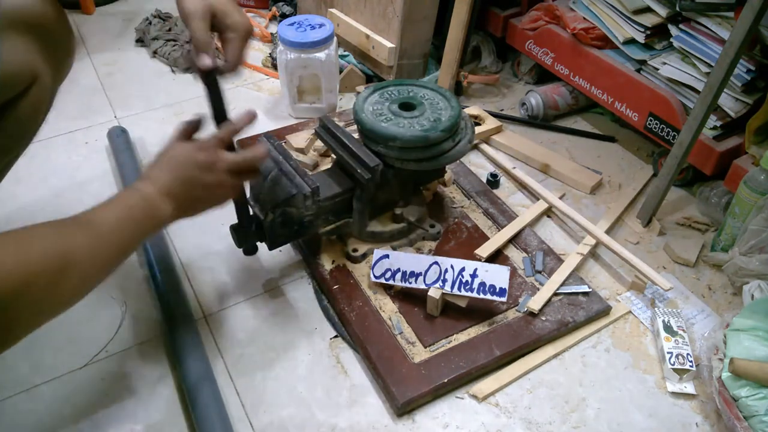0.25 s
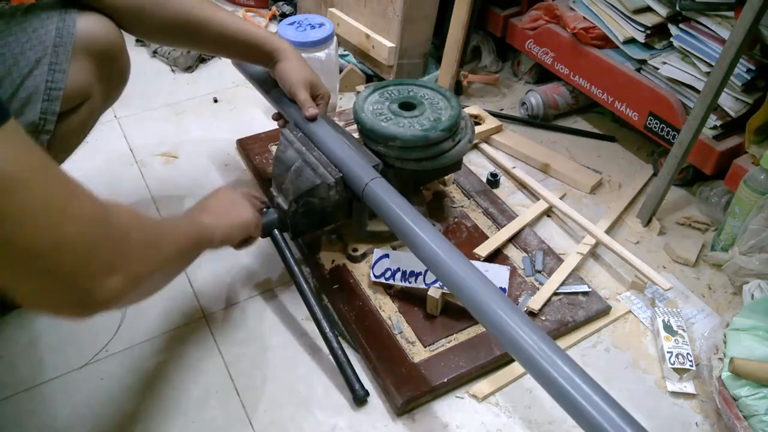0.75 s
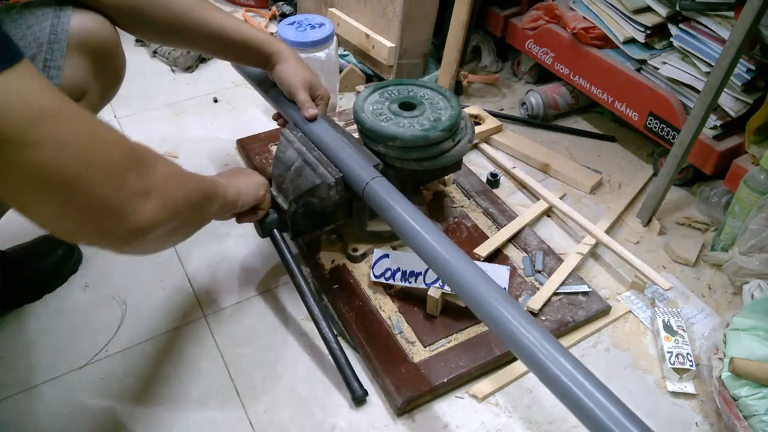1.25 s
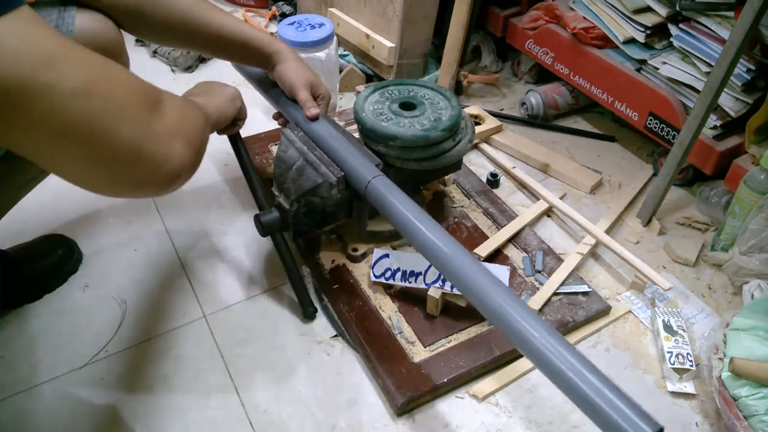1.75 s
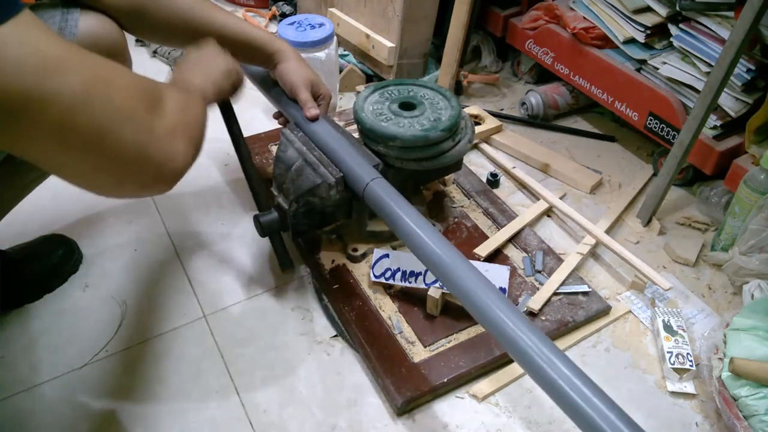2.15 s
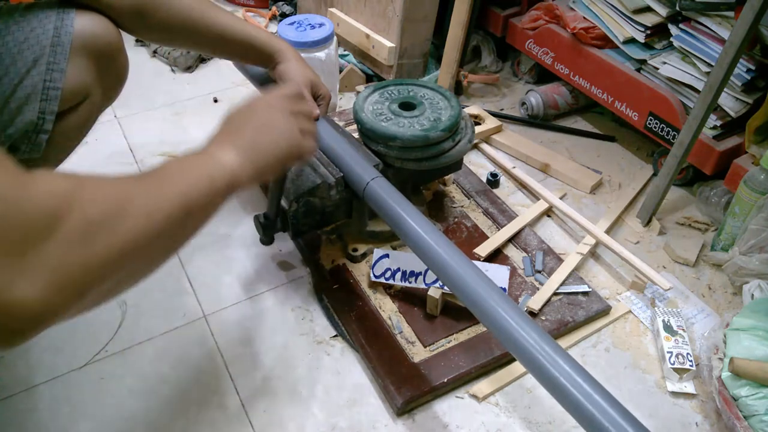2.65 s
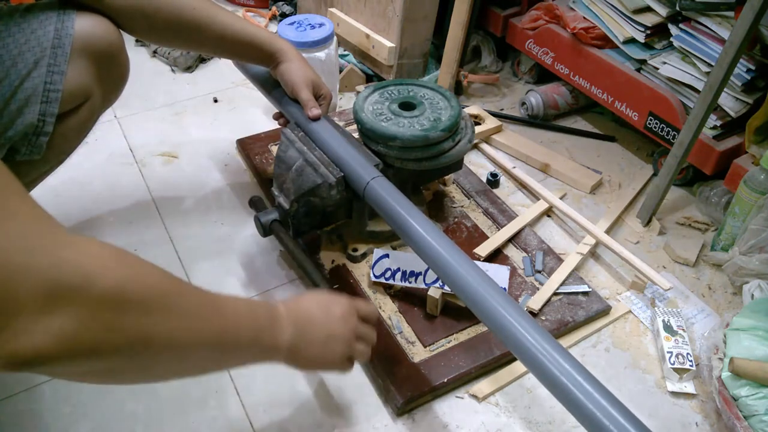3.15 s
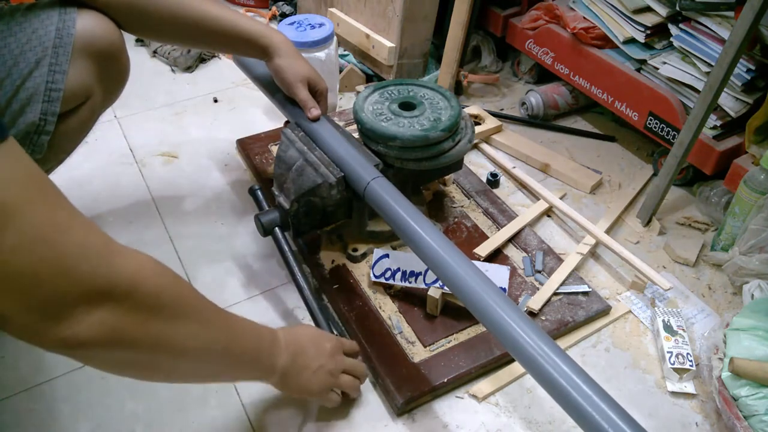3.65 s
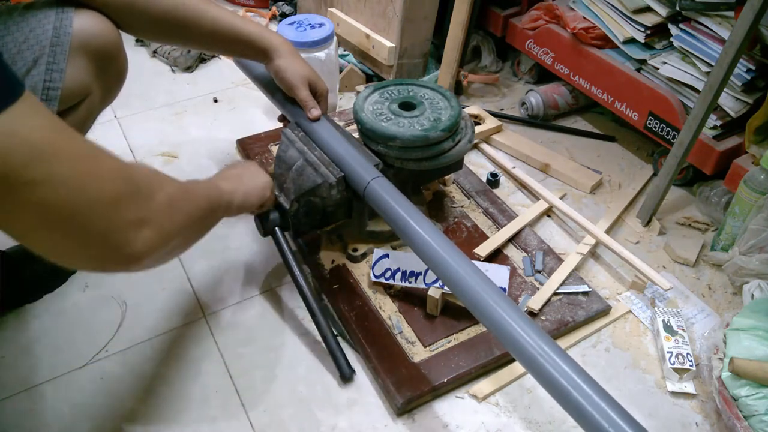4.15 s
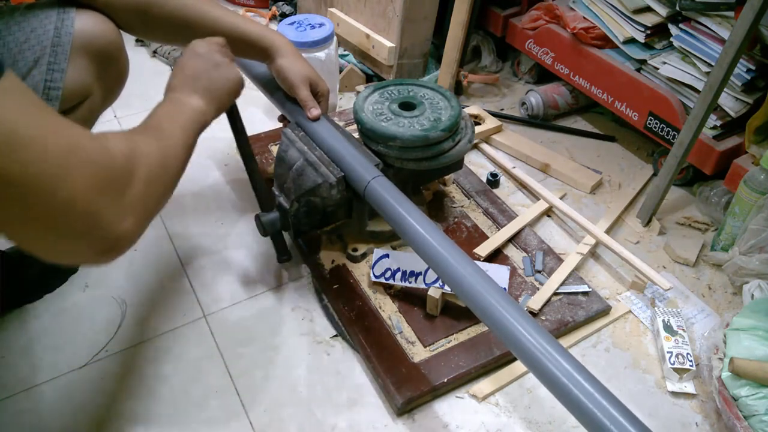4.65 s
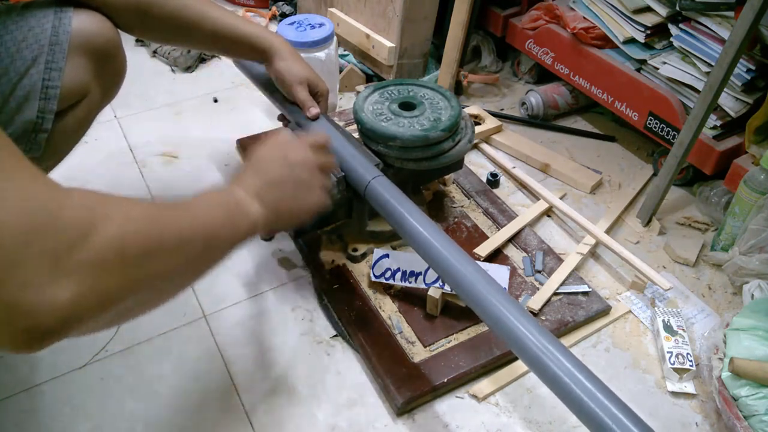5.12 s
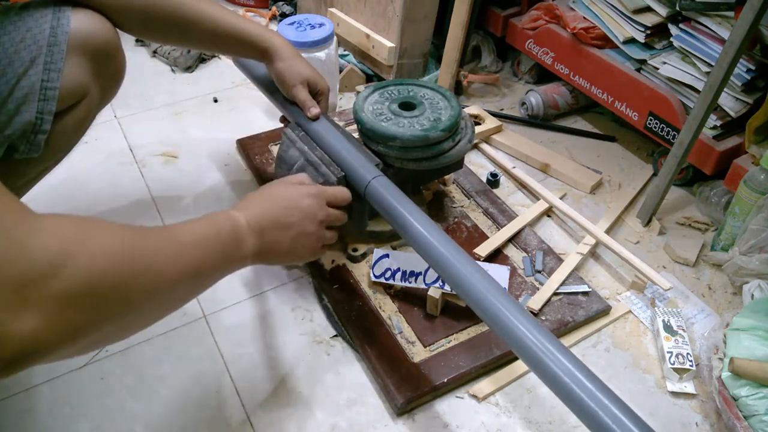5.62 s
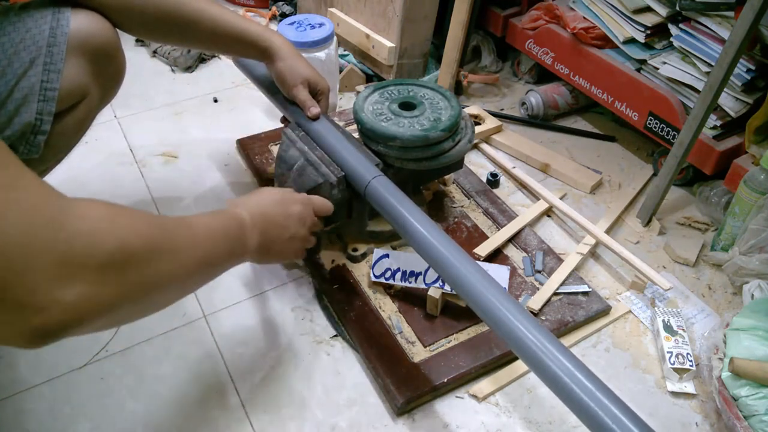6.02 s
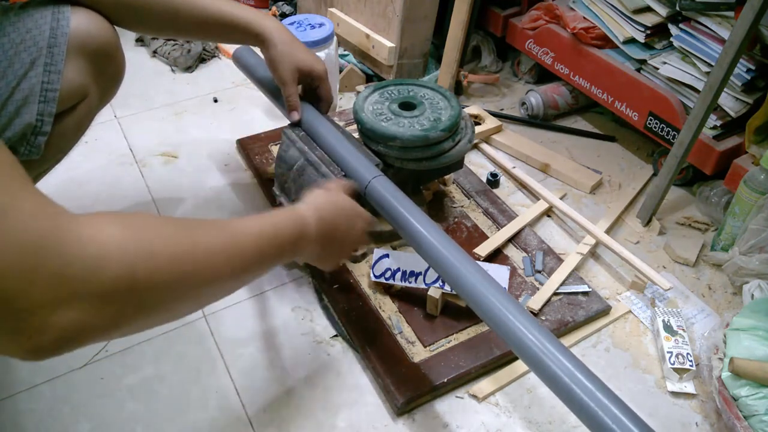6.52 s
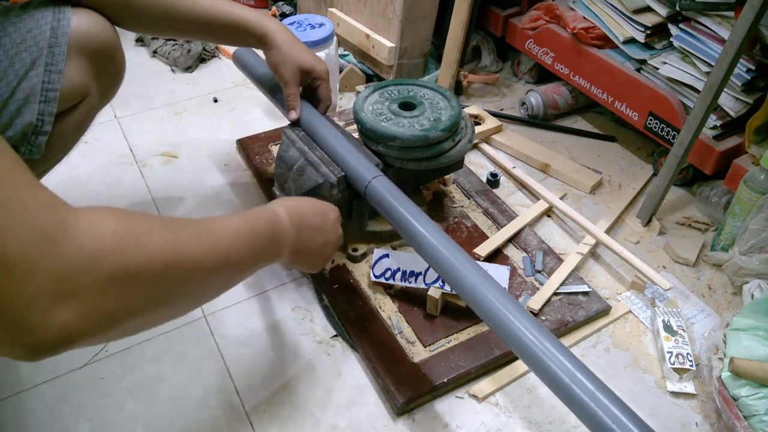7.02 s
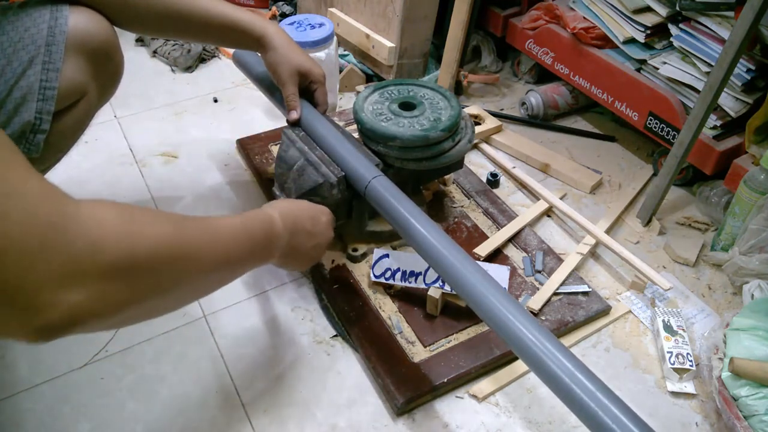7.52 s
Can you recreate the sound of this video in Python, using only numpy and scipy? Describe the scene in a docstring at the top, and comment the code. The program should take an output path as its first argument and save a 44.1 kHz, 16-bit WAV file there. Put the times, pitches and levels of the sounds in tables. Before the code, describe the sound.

Close, single-channel sound of a steel bar sliding and knocking through the screw head of an iron vise. Sparse soft rubs and thin gliding squeaks separate a few sharp clanks with quick bouncing rattles and dull board thumps. The strongest hits ring high and briefly, echoing off hard tiles. After a late clunk come faint squeaks, two light knocks and a last clack, over steady rumble, hiss and hum.

```python
"""A cast-iron bench vise on a wooden board is screwed shut in a small tiled workshop.
Its loose steel handle slides through the screw head (filtered friction noise and ringing modes)
and knocks and rattles (noisy contacts ringing handle, screw, casting and board).
The screw squeaks (narrow gliding noise) and clunks across its slack (dying sines); a palm brushes the bar.
Rumble, hiss and a wavering hum fill the room; all but these pass through a decaying noise tail."""
import sys
import numpy as np
from scipy import signal
from scipy.fft import rfft, irfft
from scipy.io import wavfile
from scipy.ndimage import uniform_filter1d

SR = 44100
rng = np.random.default_rng(int(sys.argv[2]) if len(sys.argv) > 2 else 0)


def wav_out(sig):
    """Save sig, one row per channel (or a flat mono array), as 16-bit PCM at SR to the path in sys.argv[1]."""
    wavfile.write(sys.argv[1], SR, np.round(np.clip(np.atleast_2d(sig).T, -1, 1) * 32767).astype(np.int16))


N = 343084
TIME = np.arange(SR * 3 // 4) / SR  # seconds, for rings and the room tail
RING_SWELL = 1 - np.exp(-TIME / .0012)


def amp(db):
    """Decibels to gain."""
    return 10 ** (np.asarray(db) / 20)


def read(points, hz):
    """Table joined by straight lines on a log-frequency axis."""
    table_hz, value = np.transpose(points)
    return np.interp(np.log(hz + 1), np.log(table_hz + 1), value)


def unit(x):
    """Scales to an energy of one."""
    return x / (np.linalg.norm(x) + 1e-12)


def evened(x):
    """Scales to an rms of one."""
    return unit(x) * np.sqrt(len(x))


def add(mix, start_s, sound):
    """Mixes a sound in at a time, cut at the end of the mix."""
    part = mix[max(round(start_s * SR), 0):][:len(sound)]
    part += sound[:len(part)]


def colour(x, points, treble_db=0, corner_hz=2700, size=4096):
    """Causal filter with a given spectrum; the treble steps up or down over the octave above a corner."""
    hz = abs(np.fft.fftfreq(size, 1 / SR))
    treble_step = np.clip(np.log2((hz + 1) / corner_hz), 0, 1)
    log_gain = np.log(amp(read(points, hz) + treble_db * treble_step))
    # minimum phase from the log gain
    taps = np.fft.ifft(np.exp(np.conj(signal.hilbert(log_gain)))).real
    return signal.fftconvolve(x, taps[:size // 2])[:len(x)]


def ring(modes, damping=1, spread=0.):
    """Dying sines of one blow, energy one; the contact varies their phases and detunes them a little."""
    total = np.zeros(len(TIME))
    for hz, db, t60_s in modes:
        detuned_hz = hz * (1 + spread * rng.standard_normal())
        decay = amp(db - 60 * damping * TIME / t60_s)
        total += decay * np.sin(2 * np.pi * (detuned_hz * TIME + rng.random()))
    return unit(total)


def narrow(hz, width_hz):
    """Noise of rms one in a two-pole resonance that follows a pitch curve."""
    pole = np.exp(-np.pi * width_hz / SR)
    z = rng.standard_normal(len(hz)) + 1j * rng.standard_normal(len(hz))
    for _ in range(2):
        z = signal.lfilter([1 - pole], [1, -pole], z)
    return evened((z * np.exp(2j * np.pi * np.cumsum(hz) / SR)).real)


# Decay of the tiled room. Each row: frequency in Hz, t60 in seconds.
ROOM_DECAY = [(100, 0.5), (260, .5), (700, 0.46), (1800, 0.4414), (4800, 0.4444), (13000, 0.41)]


def room(x, wet, build_s=0.0056):
    """Direct sound and a dense tail from hard walls; wet is the tail's share of the energy."""
    hz, t, z = signal.stft(rng.standard_normal(len(TIME)), SR, nperseg=256)
    decay = amp(-60 * t / read(ROOM_DECAY, hz)[:, None])
    tail = signal.istft(z * decay, SR, nperseg=256)[1][:len(TIME)]
    tail = unit(tail * (1 - np.exp(-(TIME / build_s) ** 2)))
    wet = np.clip(wet, 0, 1)
    return np.sqrt(1 - wet) * x + np.sqrt(wet) * signal.fftconvolve(x, tail)[:N]


# Spectrum shape of rumble and hiss. Each row: frequency in Hz, relative level in dB per Hz.
AIR_SHAPE = [(15, -30.5), (30, -11.5), (55, -0.5), (85, 0), (110, -15), (160, -7), (250, -14.5), (400, -17),
             (600, -22), (1000, -26.5), (2500, -35.5), (5500, -38.5), (7000, -52), (15000, -50),
             (16000, -72.5)]
# Hum tones. Each row: frequency in Hz, rms level in dB.
HUM_TONES = [(50, -59), (85.5, -53), (134, -59.5), (301, -72), (413, -65.5), (482, -76.5)]


def background(air_db=-51.5, waver_hz=5):
    """Steady rumble and hiss as shaped noise, hum as narrow noise bands that waver."""
    gain = amp(read(AIR_SHAPE, np.fft.rfftfreq(N, 1 / SR)))
    air = irfft(rfft(rng.standard_normal(N)) * gain, N)
    hum = sum(amp(db) * narrow(np.full(N, hz), waver_hz) for hz, db in HUM_TONES)
    return amp(air_db) * evened(air) + hum


def friction(level_db, grain_db=5):
    """Force of many tiny catches, clumped by stick and slip, following a level curve."""
    n = len(level_db)
    catches = rng.standard_normal(n) * amp(grain_db * np.minimum(rng.exponential(1, n), 5))
    clumps = amp(2 * evened(uniform_filter1d(rng.standard_normal(n), size=160)))
    force = evened(catches * clumps) * amp(level_db) * signal.windows.tukey(n, .15)
    return np.pad(force, (0, SR // 2))  # room for the ring


# Steel handle modes. Each row: frequency in Hz, relative level end-on in dB, sideways in dB, t60 in seconds.
HANDLE_MODES = [(3036, -28, -13.5, .16), (3290, -28, -9.5, 0.1), (4097, -14, -20.5, 0.064),
                (4230, -27.5, -12.5, 0.11), (4263, -1, -4.5, 0.12), (4332, 0, -6, 0.062),
                (4350, -20, -2.5, 0.12), (4340, -28, 0.5, 0.058), (4420, -17.5, 3, 0.043),
                (5182, -28.5, -2, 0.062), (5930, -33, -20.5, .12), (6966, -17.5, -21, 0.22),
                (7000, -26, -21.5, 0.16), (8220, -24.5, -25.5, .18), (8311, -32.5, -23, 0.097),
                (9000, -37.5, -30.5, 0.1), (10000, -26.5, -35.5, 0.11), (11040, -32, -37.5, 0.19),
                (12060, -29.5, -28.5, 0.23), (15223, -37, -36.5, .17)]
END_ON_MODES = [(hz, end_db, t60_s) for hz, end_db, side_db, t60_s in HANDLE_MODES]
SIDEWAYS_MODES = [(hz, side_db, t60_s) for hz, end_db, side_db, t60_s in HANDLE_MODES]
# rubbing pushes both ways
SLIDING_MODES = [(hz, (end_db + side_db) / 2, t60_s) for hz, end_db, side_db, t60_s in HANDLE_MODES]
# Colour of rubbing. Each row: frequency in Hz, relative level in dB per Hz.
RUB_COLOUR = [(100, -12), (500, 7), (1000, 6), (1800, 4.5), (2800, -1.5), (3800, -3), (5200, -12.5),
              (7000, -31.5), (15000, -38)]
# Handle sliding through the screw head; a row ending before its start is silent.
# Each row: start in seconds, fastest in seconds, end in seconds, force level when fastest in dB,
# ring against rub in dB, treble step in dB.
SLIDE_EVENTS = [(0, .005, 0.045, -47.5, -11, 3), (0.591, 0.704, 1.01, -48.5, -13, -3),
                (1.254, 1.356, 1.59, -46.5, -8.5, -21), (2.11, 2.203, 2.316, -32.5, -7.5, 7.5),
                (4.138, 4.144, 4.45, -45, -9.5, 2), (5.687, 5.76, 5.78, -42.5, -14, -1),
                (7.451, 7.496, 6.36, -40, -23, -3)]
SLOW_DB = -16.5  # level at both ends of a slide against its fastest


def slides(rows):
    """Steel scrapes on iron, louder as the bar gathers speed, and keeps the handle singing, well damped."""
    out = np.zeros(N)
    for start_s, fastest_s, end_s, db, ring_db, treble_db in rows:
        t = np.arange(start_s, end_s, 1 / SR)
        speed_db = np.interp(t, np.sort([start_s, fastest_s, end_s]), [SLOW_DB, 0, SLOW_DB])
        force = friction(db + speed_db)
        song = signal.fftconvolve(force, ring(SLIDING_MODES, damping=2.7, spread=0.004))[:len(force)]
        rub = unit(colour(force, RUB_COLOUR, treble_db))
        add(out, start_s, np.linalg.norm(force) * (rub + amp(ring_db) * unit(song)))
    return out


def contact(t60_s, click, rise_s=0.00069, size=4096):
    """A first click, then chatter that builds as the faces meet and quickly dies."""
    t = TIME[:size]
    chatter = rng.standard_normal(size) * amp(-60 * t / t60_s) * (1 - np.exp(-t / rise_s))
    spectrum = rfft(chatter)
    # evens out the chatter's random spectrum, so the knock sounds less hollow
    flat = irfft(spectrum / (abs(spectrum) + 1e-9), size)
    force = unit(flat * amp(-20 * t / t60_s))
    force[0] += click
    return force


# Colours of iron on iron and of the board on the floor. Each row: frequency in Hz, relative level in dB per Hz.
KNOCK_COLOUR = [(60, -19.5), (300, -7), (650, -5), (950, -4.5), (1400, 2), (2200, -3.5), (2800, -1),
                (3700, -8), (4900, -7.5), (6000, -16.5), (8000, -23.5), (11000, -29), (16000, -30.5)]
BOARD_COLOUR = [(25, -17.5), (50, -2), (130, -7.5), (220, -4.5), (380, -2), (600, -11), (1200, -23.5),
                (4000, -52), (16000, -78)]
# Board rocking on the floor, iron casting, screw in its nut.
# Each row: frequency in Hz, relative level in dB, t60 in seconds.
ROCKING_MODES = [(36, -14, .45), (51.6, -3, 0.21), (103, -1, .15), (186, 1, 0.14), (212, 2, 0.18)]
CASTING_MODES = [(396, -6.5, 0.084), (483, 3, 0.059), (736, 5, 0.038), (793, 3.5, 0.045),
                 (1275, -3.5, 0.037), (1684, -6.5, 0.13), (1799, 0.5, 0.075), (1910, -6.5, 0.082),
                 (2164, -7, 0.097), (3370, -1, .05)]
SCREW_MODES = [(948, -5.5, 0.022), (1026, 1, 0.043), (1164, -2, 0.049), (1196, -6, 0.067), (1254, 1, 0.031)]
# heavy parts: dB at a strength of 0 dB, and dB gained per dB of strength
CASTING_DB, CASTING_GROWTH = -3.5, 0.62
SCREW_DB, SCREW_GROWTH = -8.5, 0.41


def strike(strength_db, thud_db, treble_db, ring_db, end_on, rocking_db=-1.5, grip=0.00092):
    """One contact knocks the casting, thumps the board and rings handle and screw; returns knock and ring."""
    click = unit(colour(contact(t60_s=.045, click=0.54), KNOCK_COLOUR, treble_db))
    thump = unit(colour(contact(t60_s=0.053, click=0.63), BOARD_COLOUR))
    knock = amp(strength_db) * click + amp(thud_db) * thump
    casting = amp(CASTING_DB + CASTING_GROWTH * strength_db) * ring(CASTING_MODES, spread=0.017)
    rocking = amp(thud_db + rocking_db) * ring(ROCKING_MODES)
    screw = amp(SCREW_DB + SCREW_GROWTH * strength_db) * ring(SCREW_MODES, spread=0.02)
    # hit sideways, the bar is pinched in its hole, which detunes it more
    end_on = np.clip(end_on, 0, 1)
    steel = np.sqrt(end_on) * ring(END_ON_MODES, spread=grip)
    steel += np.sqrt(1 - end_on) * ring(SIDEWAYS_MODES, spread=2 * grip)
    return knock, casting + rocking + screw + amp(ring_db) * steel


# Single knocks of the hand-held handle. Each row: time in seconds, strength in dB, board thud in dB,
# bar ring in dB, treble step in dB.
HELD_KNOCKS = [ (0.017, -24, -27, -39, -7), (0.057, -9.5, -23, -19, -2), (1.645, -23, -5.5, -33, 3),
               (1.689, -10.5, -17, -36, -11), (1.877, -20, -17, -21, -8), (4.226, -16, -21, -19, 3.5),
               (4.634, -50, -26, -49, 0), (5.755, -12, -18, -22, -2), (5.778, 12, 5, -3.5, -10),
               (7.162, -16.5, -18.5, -33, -5.5), (7.326, -14, -16.5, -31, 5.5)]
HELD_END_ON = 1  # end-on share of the ring of a held bar
# Loose handle hitting its end knob and rattling in its hole. Each row: start in seconds, length in seconds,
# time between contacts in seconds, first strength in dB, first board thud in dB, bar ring at second contact in dB,
# ring change per contact away from the second in dB, end-on share 0-1.
HANDLE_RATTLES = [ (0.278, .005, .005, -19.5, -21.5, -19.5, 2, .55),
                  (1.390, .006, .006, -9, -31, -7.5, 3, 0), (1.896, .052, 0.016, 4.5, -10.5, 6.5, -7, 0),
                  (2.206, .053, 0.017, 5.5, -15, 3.5, 2, .3), (3.577, .057, .0142, 5.5, 6, 16.5, -6.5, 0.9),
                  (7.5244, .005, .005, 9.5, -2, 1.5, 5.5, 0.24)]
# change of strength and thud per contact; bare steel is bright
REBOUND_DB, REBOUND_THUD_DB, RATTLE_TREBLE_DB = -1.08, -5.5, 2.5


def contacts():
    """Yields time, knock and ring of every contact; each rebound of a rattle is weaker than the last."""
    for start_s, strength_db, thud_db, ring_db, treble_db in HELD_KNOCKS:
        yield start_s, *strike(strength_db, thud_db, treble_db, ring_db, HELD_END_ON)
    for start_s, length_s, gap_s, strength_db, thud_db, ring_db, change_db, end_on in HANDLE_RATTLES:
        for k in range(round(length_s / gap_s) + 1):
            knock, ringing = strike(strength_db + k * REBOUND_DB, thud_db + k * REBOUND_THUD_DB,
                                    RATTLE_TREBLE_DB, ring_db + abs(k - 1) * change_db, end_on)
            yield start_s + k * gap_s, knock, ringing


def handle_blows():
    """Places all handle contacts, rings swelling in over about a millisecond; returns knocks and rings."""
    knocks, rings = np.zeros((2, N))
    for start_s, knock, ringing in contacts():
        add(knocks, start_s, knock)
        add(rings, start_s, RING_SWELL * ringing)
    return knocks, rings


# Squeaks of the thread and of the sliding bar. Each row: start in seconds, end in seconds, middle pitch in Hz,
# rise in Hz, width in Hz, level before the common trim in dB.
SQUEAK_EVENTS = [(1.231, 1.395, 4380, 140, 42, -55), (1.497, 1.61, 4000, -120, 60, -58.5),
                 (1.603, 1.90, 3400, -100, 519, -54.5), (4.136, 4.174, 4540, -140, 90, -45),
                 (4.273, 4.402, 4970, 400, 400, -59), (4.453, 4.592, 5030, -300, 400, -65),
                 (4.493, 4.61, 3220, -900, 454, -65), (5.667, 5.743, 1032, -68, 110, -52),
                 (5.67, 5.743, 2830, 0, 140, -54.5), (5.945, 6.103, 3150, -100, 400, -56),
                 (6.137, 6.22, 3420, 248, 400, -58), (6.149, 6.27, 3665, 46, 30, -60),
                 (6.344, 6.509, 3134, 328, 350, -59)]
SQUEAK_SAG = 0.82  # pitch sags at both ends by this many widths: rough ones bend most


def squeaks(trim_db=-2, octave_db=-22):
    """Dry steel gives thin, gliding whistles with a weak octave: narrow noise on an arched pitch."""
    out = np.zeros(N)
    for start_s, end_s, middle_hz, rise_hz, width_hz, db in SQUEAK_EVENTS:
        place = np.linspace(-1, 1, max(round((end_s - start_s) * SR), 64))
        hz = middle_hz + rise_hz * place / 2 - SQUEAK_SAG * width_hz * place ** 2
        tone = narrow(hz, width_hz) + amp(octave_db) * narrow(2 * hz, 2 * width_hz)
        add(out, start_s, amp(db + trim_db) * tone * signal.windows.tukey(len(hz), .7))
    return out


# Screw jumping across its slack. Each row: time in seconds, level in dB.
SLACK_CLUNKS = [(2.205, 9), (4.225, -2.5), (5.778, 5.5)]


def clunks():
    """The screw takes up its slack and rings in its nut: its modes alone, swelling and dying."""
    out = np.zeros(N)
    for start_s, db in SLACK_CLUNKS:
        add(out, start_s, RING_SWELL * amp(db) * ring(SCREW_MODES, spread=0.0091))
    return out


# Palm brushing round the handle. Each row: start in seconds, force level in dB.
PALM_BRUSHES = [(2.789, -50), (4.785, -68.5), (4.991, -69), (5.28, -65)]
BRUSH_S, BRUSH_TREBLE_DB = .078, 16


def brushes():
    """Skin on steel: a short, bright rub without any ring."""
    out = np.zeros(N)
    for start_s, db in PALM_BRUSHES:
        force = friction(np.full(round(BRUSH_S * SR), db))
        rub = unit(colour(force, RUB_COLOUR, BRUSH_TREBLE_DB))
        add(out, start_s, np.linalg.norm(force) * rub)
    return out


CUT_S = .797  # an edit cuts off the scrapes begun before this, and their echo, here


def scene(wet=0.53):
    """The vise in the workshop, on one channel; rings get a smaller share of tail than the rest."""
    early = slides([row for row in SLIDE_EVENTS if row[0] < CUT_S])
    early = room(early, wet) * (np.arange(N) < CUT_S * SR)
    late = slides([row for row in SLIDE_EVENTS if row[0] >= CUT_S])
    knocks, rings = handle_blows()
    noises = room(knocks + late + brushes() + squeaks(), wet)
    ringing = room(rings + clunks(), wet=0.3)
    return (early + noises + ringing + background())[None]


def record(dry, edge_hz=15850):
    """Band limit: a steep linear-phase low-pass."""
    lowpass = signal.firwin(511, edge_hz, window=("kaiser", 9), fs=SR)
    return signal.oaconvolve(dry, lowpass[None], "same")


dry = scene()
out = record(dry)
wav_out(out)
```